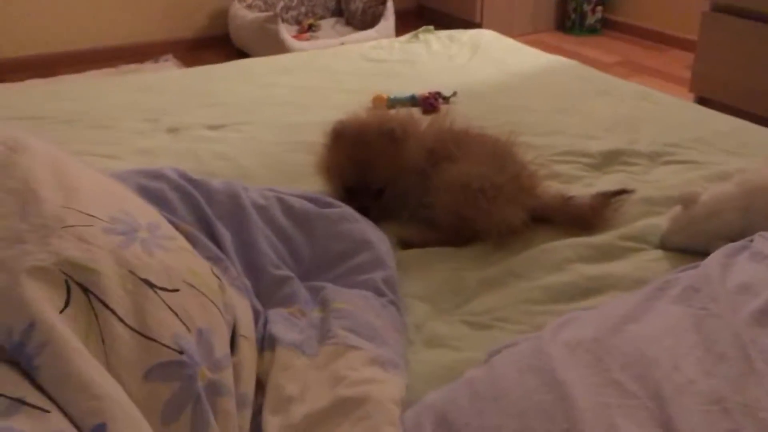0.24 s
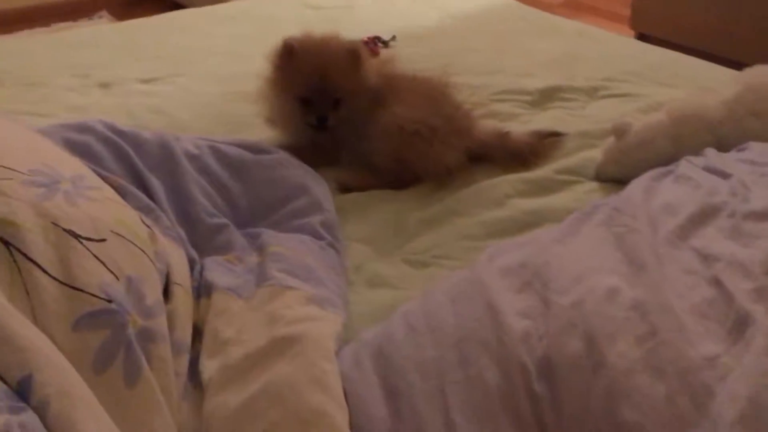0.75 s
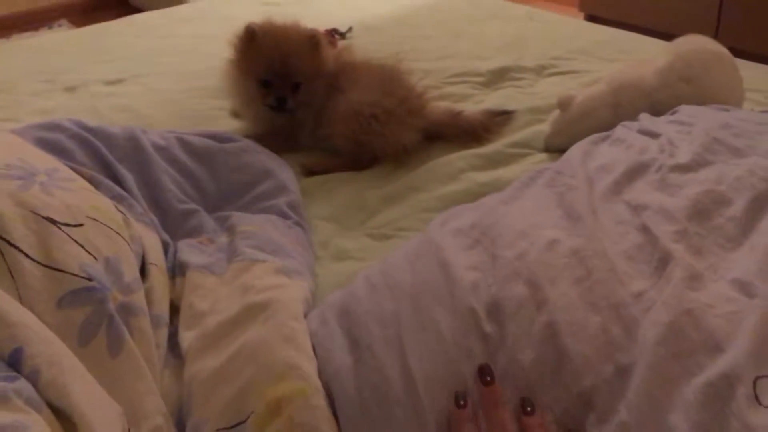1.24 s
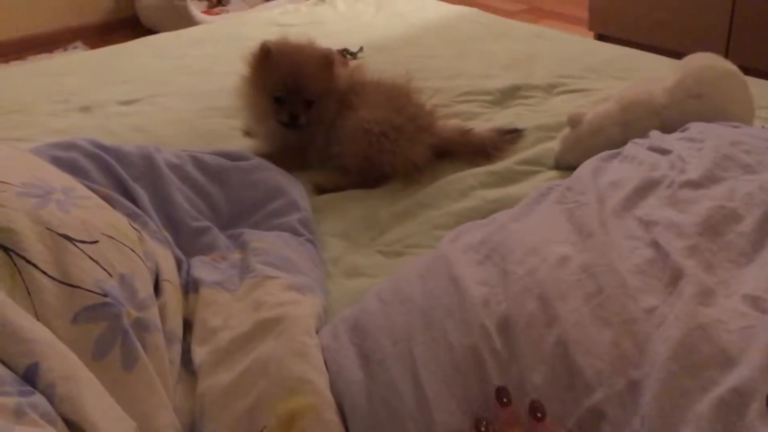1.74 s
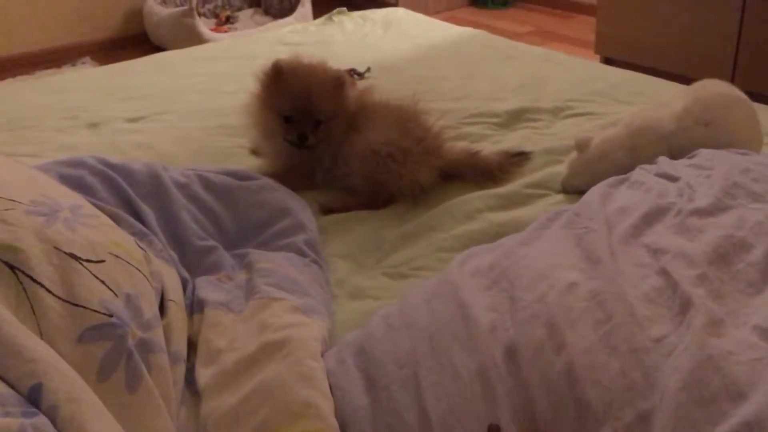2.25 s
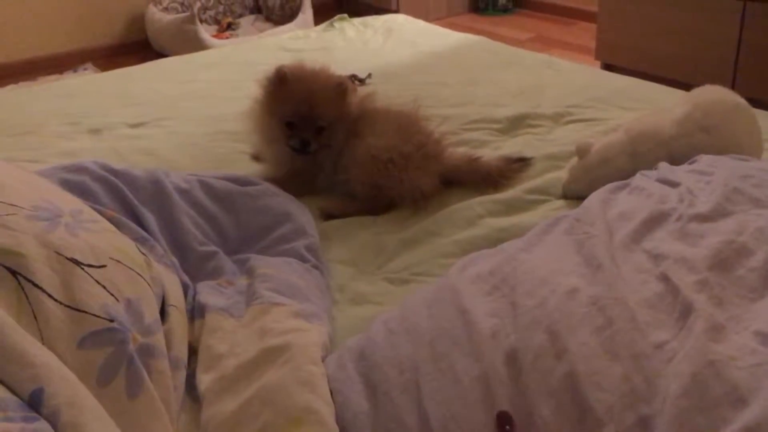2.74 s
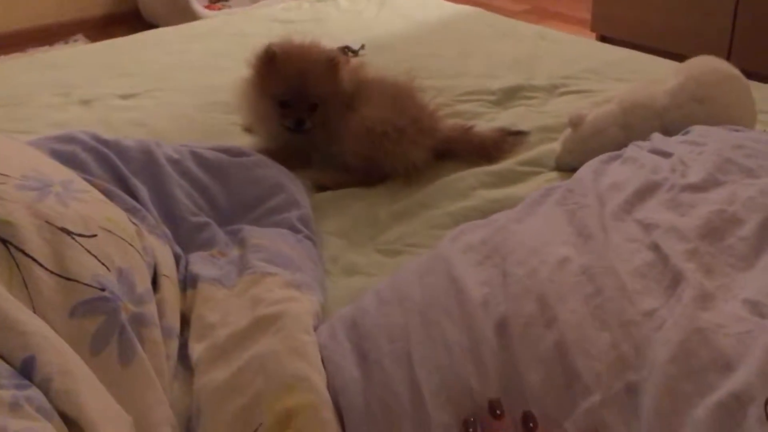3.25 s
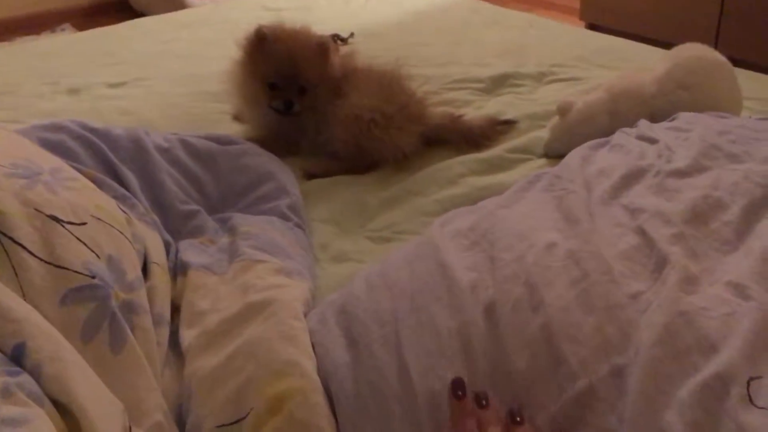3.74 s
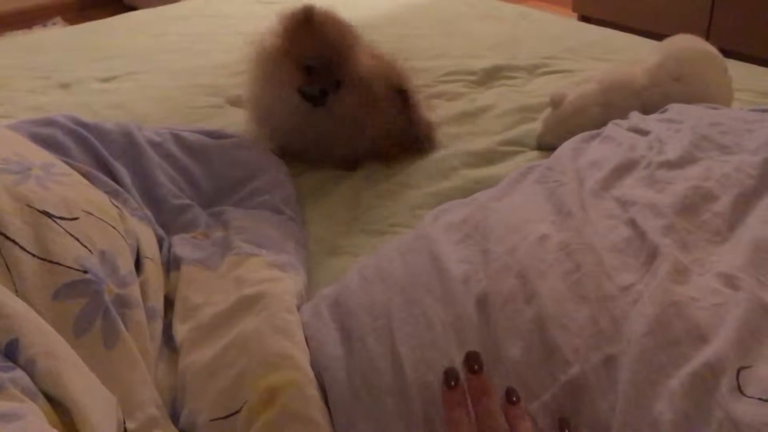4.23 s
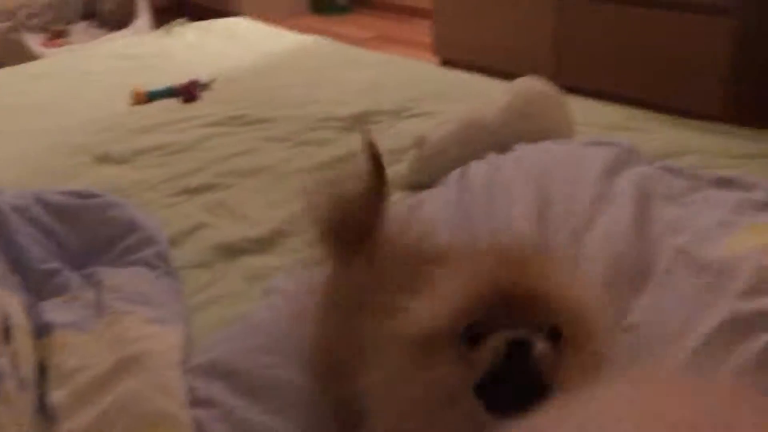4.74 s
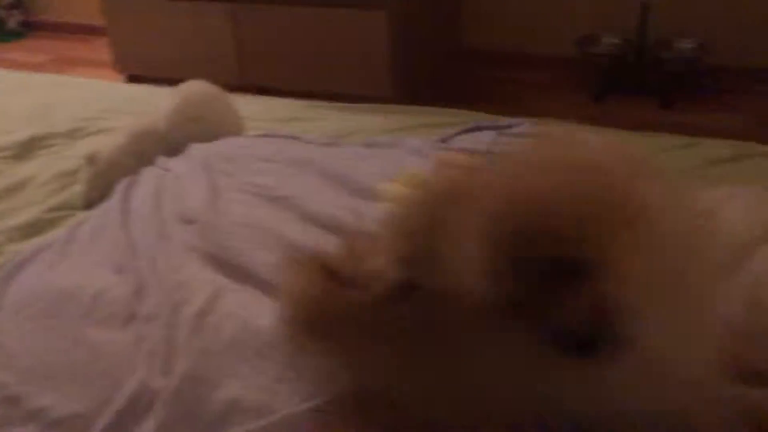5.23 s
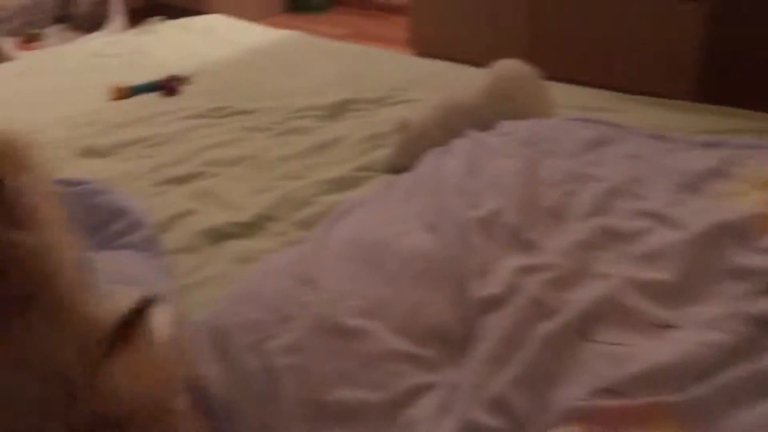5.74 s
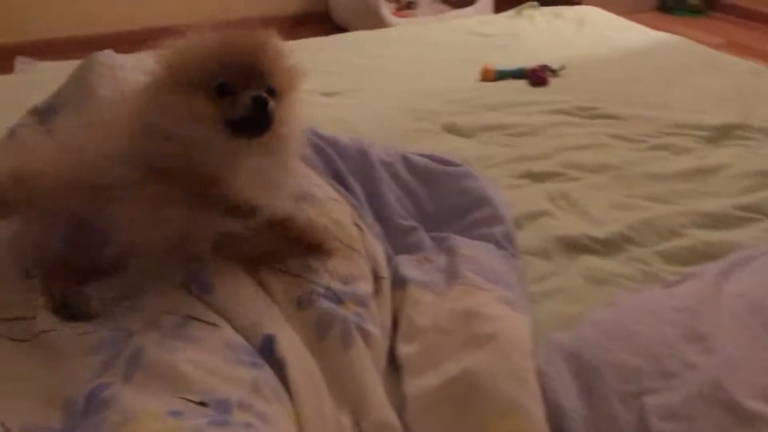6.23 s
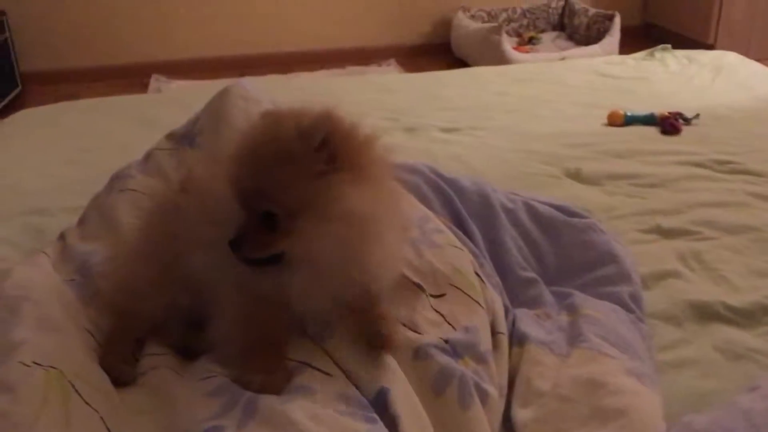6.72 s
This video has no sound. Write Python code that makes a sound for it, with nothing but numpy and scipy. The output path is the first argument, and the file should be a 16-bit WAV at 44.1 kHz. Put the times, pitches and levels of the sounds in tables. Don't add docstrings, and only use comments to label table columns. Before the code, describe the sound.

Soft pats and a flat slap on bedding, light finger drumming, then scrambling paws, one sharp tiny-dog yap, faint panting and rustling cloth.

```python
import sys
import numpy as np
from scipy import signal
from scipy.fft import rfft, irfft, next_fast_len
from scipy.io import wavfile
from scipy.ndimage import uniform_filter1d, minimum_filter1d

SR = 44100
rng = np.random.default_rng(int(sys.argv[2]) if len(sys.argv) > 2 else 0)


def transcribe(signal):
    frames = np.atleast_2d(signal).T
    limited = np.clip(frames, -1, 1)
    pcm = np.round(limited * 32767).astype(np.int16)
    wavfile.write(sys.argv[1], SR, pcm)


def voltage_ratio(decibels):
    exponent = np.asarray(decibels, float) / 20
    return 10 ** exponent


N = 307818

# (frequency [Hz], level [dB])
HUSH_SPECTRUM = [(13, -33), (22, -27.5), (49, 2), (72, 0), (124, -6.5), (177, -15.5), (298, -13),
                 (476, -25), (609, -23), (824, -28), (2340, -32.5), (4390, -37), (4900, -37.5), (9220, -39),
                 (15500, -44)]
# (frequency [Hz], width [Hz], level [dB])
HOUSE_NOTES = [(59, 4.7, -64), (85.5, 20, -72)]
# (frequency [Hz], t60 [s])
ROOM_T60 = [(200, 0.2), (800, 0.37), (1600, 0.4), (3000, 0.41), (6000, 0.46), (14000, 0.38)]
# (frequency [Hz], level [dB], t60 [s])
PANELS = [(1556, -36, 0.51), (1585, -37.5, 0.45), (1609.7, -44, 0.94), (1676, -47, 1), (2000, -41.5, .6),
          (2223, -45, .6), (2560, -35.5, 0.6), (3830, -40, .4), (4110, -41.5, 0.76)]
# (time [s], drag [dB], weight on mattress [dB])
RUSTLE_BOUTS = [
    [(0.0, -69, -64), (0.15, -68.5, -59), (0.39, -76.5, -53), (0.6, -99, -57)],
    [(4.5, -85, -57), (4.616, -70, -52), (4.738, -62.5, -44.5), (4.93, -61.5, -48.5), (5.075, -69, -58.5)],
    [(5.25, -66, -53), (5.5, -63.5, -56), (5.74, -66.5, -47.5), (5.908, -68, -59), (6.134, -73, -66.5),
     (6.5, -80.5, -82)],
]
BOUT_FIZZ_DB = [-13.5, -7, -3.5]
# (frequency [Hz], level [dB])
SWISH_SPECTRUM = [(180, -31), (300, -3.5), (403, -4), (480, -12), (1310, -12.5), (1600, -15), (2500, -17),
                  (2980, -24), (5000, -29), (6500, -63), (11000, -120)]
# (frequency [Hz], level [dB])
FIZZ_SPECTRUM = [(2500, -31), (4500, -2), (7000, 1), (12000, -4), (15500, -4)]
# (frequency [Hz], level [dB])
HEAVE_SPECTRUM = [(15, -44.5), (25, -13), (46, 6.5), (92, -6.5), (134, -5), (301, -11.5), (372, -14),
                  (494, -24.5), (900, -33), (1170, -58), (1980, -120)]
# (time [s], peak [dB], centre [Hz], width [Hz], length [s])
CATCHES = [(.3972, -45, 2600, 3000, .004), (0.4044, -27, 1900, 890, 0.0038),
           (.4052, -29.5, 3300, 1390, 0.0021), (0.4057, -35, 8000, 9000, 0.0011),
           (2.341, -63, 2300, 300, .006), (4.6984, -39.5, 2950, 1400, .003),
           (4.6988, -50, 6500, 3500, 0.0032), (4.758, -33, 2000, 1490, 0.0034),
           (4.842, -48.5, 11800, 1400, 0.024), (4.8427, -41, 6800, 6000, 0.007),
           (4.848, -39, 6500, 6000, 0.0051), (4.851, -41.5, 3000, 1200, 0.0036),
           (4.86, -40.5, 6500, 6000, 0.004), (4.9019, -35.5, 2500, 2630, 0.0033),
           (4.902, -47.5, 8800, 2500, 0.0021), (5.0831, -24.5, 2000, 607, 0.0087),
           (5.0833, -37.5, 4000, 2500, .002), (5.16, -34.5, 55, 60.4, 0.12),
           (5.251, -48.5, 10000, 6000, 0.044), (5.414, -42.5, 8000, 1840, .004),
           (5.557, -49.5, 7250, 3500, 0.072), (5.65, -53, 6000, 2510, 0.027),
           (6.173, -53, 2200, 1494, 0.085), (6.2088, -42, 2900, 1704, 0.0034)]
# (time [s], pat [dB], pat pitch [Hz], mattress thud [dB])
FINGER_PATS = [(1.4, -41.5, 283, -42.5), (1.668, -55, 232.3, -55), (1.704, -55, 198, -45.5),
               (1.761, -54.5, 206, -54), (1.887, -63, 290, -57), (1.995, -51, 267, -47),
               (2.019, -50, 190.5, -48.5), (2.272, -58, 182.1, -69.5), (2.31, -44.5, 241, -69),
               (2.46, -68, 213, -57), (2.862, -63, 264, -49), (2.893, -48.5, 172, -50),
               (2.919, -42.5, 163.1, -46), (3.185, -47, 178, -54), (3.229, -48, 175.6, -53),
               (3.533, -56, 205, -45.5), (3.738, -57.5, 172, -55), (3.776, -59.5, 245, -49),
               (3.829, -51.5, 231, -45), (3.887, -56, 172, -76), (4.067, -52, 266, -47),
               (4.114, -45.5, 265, -45), (4.177, -61, 239, -51), (4.336, -57, 188.2, -48),
               (4.397, -42.5, 257, -41.5), (4.446, -57, 207, -64)]
# (time [s], pat [dB], pat pitch [Hz],
# mattress thud [dB])
PAW_PATS = [(0.214, -43.5, 152, -44), (0.233, -52, 151.2, -60), (0.455, -60, 150, -32.5),
            (0.51, -64, 150, -38), (0.543, -63, 150, -38.5), (4.564, -46, 152, -39),
            (4.58, -61, 151, -33.5), (4.625, -44.5, 177, -42), (4.696, -55, 200, -39.5),
            (4.767, -32.5, 195, -44), (4.779, -29, 240, -34.5), (4.789, -31, 159, -35),
            (4.804, -34.5, 302, -42), (4.868, -47.5, 151, -30.5), (4.886, -37, 209.1, -31.5),
            (4.93, -48, 332.4, -37), (5.168, -32, 153.6, -49), (5.257, -35, 337, -37),
            (5.34, -44, 146.3, -52), (5.515, -38.5, 147, -32), (5.574, -39, 369, -34.5),
            (5.617, -55, 157, -41), (5.67, -49, 224, -30.5), (5.727, -43, 148.2, -39),
            (5.802, -41, 154.4, -38), (5.851, -47, 151, -39.5), (5.905, -52, 222.6, -45),
            (6.474, -56, 229, -49)]
# (time [s], pat [dB], pat pitch [Hz], mattress thud [dB], cloth tick [dB])
HAND_SLAPS = [
    (.395, -39, 507, -65.5, -42),
    (.3995, -24.5, 417, -60, -35),
    (.4028, -20, 450, -47, -27),
    (.402, -40, 297, -19, -70.5),
    (2.342, -46, 400, -46.5, -62),
    (2.627, -42, 410, -43.5, -51),
]
# (start [s], length [s], level [dB], mouth opening as resonance factor [1])
PANTS = [
    (5.283, 0.43, -51.5, 0.97),
    (5.659, 0.5348, -69, 0.985),
    (6.122, 0.33, -68.5, 0.886),
]
# (frequency [Hz], width [Hz], level [dB])
SNOUT = [(2027, 200, -1.5), (2495, 196, -2), (3290, 330, -3), (3865, 450, -1.5)]
# (frequency [Hz], level [dB])
THROAT_SLOPE = [(250, -44.5), (400, -32.5), (800, -27.5), (1200, -14), (2000, -12.5), (3000, -18),
                (4500, -20.5), (5200, -32.5), (7300, -38), (8200, -51.5), (11400, -61.5), (13500, -49),
                (15500, -49)]
# (frequency [Hz], width [Hz], lift [dB])
FORMANTS = [(1530, 180, 9.5), (2680, 250, 10.5), (3500, 240, 4.5), (4500, 52, 7), (5600, 450, 5.5)]
# (frequency [Hz], width [Hz], lift [dB])
NOSE_DIPS = [(2390, 170, -18), (3130, 130, -9), (4800, 250, -13)]
# (time [s], pitch [Hz], effort [dB])
YAP = [
    (5.085, 399, -33.5),
    (5.096, 504, -21.5),
    (5.11, 626, -10.5),
    (5.12, 719, -7.5),
    (5.134, 772.6, -4),
    (5.148, 809.3, -6),
    (5.156, 842, -11.5),
    (5.158, 621.5, -13),
    (5.174, 683.4, -12.5),
]


def evened(x):
    return x / np.sqrt(np.mean(x ** 2) + 1e-20)


def read(points, hz):
    f, value = np.transpose(points)
    return np.interp(np.log(hz + 1), np.log(f + 1), value)


def add(mix, start_s, sound):
    part = mix[round(start_s * SR):][:len(sound)]
    part += sound[:len(part)]


def spread(rows):
    s, *columns = np.transpose(rows)
    t = np.arange(s[0], s[-1], 1 / SR)
    return s[0], [np.interp(t, s, column) for column in columns]


def resonate(x, hz, width_hz):
    turn = np.exp(2j * np.pi * np.cumsum(hz * np.ones(len(x))) / SR)
    r = np.exp(-np.pi * width_hz / SR)
    return 2 * (turn * signal.lfilter([1 - r], [1, -r], x / turn + 1e-18)).real


def resonate_twice(x, hz, width_hz):
    return resonate(resonate(x, hz, width_hz), hz, width_hz)


def coloured(x, points):
    size = next_fast_len(len(x) + 2048)
    gain = voltage_ratio(read(points, np.fft.rfftfreq(size, 1 / SR)))
    return irfft(rfft(x, size) * gain, size)[:len(x)]


def lumps(count, size):
    return evened(uniform_filter1d(uniform_filter1d(rng.standard_normal(count), size), size))


def lumpy_noise(count, depth_db, size):
    return rng.standard_normal(count) * voltage_ratio(depth_db * lumps(count, size))


def burst(seconds, hz, width_hz, push=0):
    t = np.arange(6000) / SR / seconds
    puff = (push + rng.standard_normal(len(t))) * t * np.exp(-t)
    puff = resonate_twice(puff, hz, width_hz)
    return puff / abs(puff).max()


def bumps(modes, hz):
    return sum(db / (1 + (2 * (hz - f) / w) ** 2) for f, w, db in modes)


def hush():
    wander = voltage_ratio(1.6 * lumps(N, size=2500))
    noise = coloured(rng.standard_normal(N), HUSH_SPECTRUM)
    low = signal.sosfiltfilt(signal.butter(2, 400, fs=SR, output="sos"), noise)
    notes = sum(voltage_ratio(db) * evened(resonate_twice(rng.standard_normal(N), hz, w))
                for hz, w, db in HOUSE_NOTES)
    return voltage_ratio(-61) * evened(noise - low + low * wander) + notes


def room(x):
    taps = np.zeros(SR)
    at = np.arange(300, SR - 20, 20)
    taps[at + rng.integers(0, 20, len(at))] = rng.choice([-1., 1.], len(at))
    hz, t, z = signal.stft(taps, SR, nperseg=256)
    decay = voltage_ratio(-60 * t / read(ROOM_T60, hz)[:, None])
    tail = signal.istft(z * decay, SR, nperseg=256)[1]
    return signal.fftconvolve(x, tail / np.linalg.norm(tail))[:N]


def rings(x):
    t = np.arange(SR) / SR
    panels = sum(voltage_ratio(db - 60 * t / t60) * np.sin(2 * np.pi * hz * t) for hz, db, t60 in PANELS)
    return signal.fftconvolve(x, panels * voltage_ratio(-30.5))[:N]


def rustle(rows, fizz_db):
    s, (drag_db, heave_db) = spread(rows)
    count = len(drag_db)
    swish = evened(coloured(lumpy_noise(count, 1.5, size=300), SWISH_SPECTRUM))
    fizz = evened(coloured(lumpy_noise(count, 2.5, size=40), FIZZ_SPECTRUM))
    heave = evened(coloured(lumpy_noise(count, 2.4, size=900), HEAVE_SPECTRUM))
    sound = voltage_ratio(drag_db + 7.5) * swish
    sound += voltage_ratio(drag_db + fizz_db + 1.5) * fizz
    sound += voltage_ratio(heave_db - 2.0) * heave
    return s, sound * signal.windows.tukey(count, .05)


def snag(peak_db, hz, width_hz, length_s):
    return voltage_ratio(peak_db) * burst(0.19 * length_s, hz, width_hz)


def pat(pat_db, hz, thud_db, tick_db, t60_s):
    t = np.arange(6000) / SR
    thud = -np.sin(2 * np.pi * 93 * rng.uniform(.93, 0.98) * t)
    thud *= voltage_ratio(-60 * t / t60_s) * (1 - np.exp(-(t / 0.0044) ** 2))
    push = np.sin(2 * np.pi * hz * t) * t * np.exp(-t * hz / 0.29)
    push = push / abs(push).max() + 0.7 * burst(0.00055, 2.2 * hz, 680, push=1.2)
    tick = burst(0.0001, 1300, 1500, push=2.1)
    return voltage_ratio(pat_db) * push + voltage_ratio(thud_db + 5.5) * thud + voltage_ratio(tick_db + 4.5) * tick


def pant(s, length_s, level_db, mouth):
    rise_share, fall_share, edge_db = 0.23, .35, -14.5
    share = np.arange(0, length_s, 1 / SR) / length_s
    edge = np.maximum(1 - share / rise_share, 1 - (1 - share) / fall_share)
    swell_db = edge_db * np.clip(edge, 0, 1)
    air = rng.standard_normal(len(share))
    snout = sum(voltage_ratio(db) * resonate_twice(air, hz * mouth, w) for hz, w, db in SNOUT)
    return s, voltage_ratio(level_db + swell_db) * evened(snout) * signal.windows.tukey(len(air), .1)


def throat_db(hz, mouth):
    return read(THROAT_SLOPE, hz / mouth) + bumps(FORMANTS, hz / mouth) + bumps(NOSE_DIPS, hz)


def voice(hz, mouth, rough, lowest, edge_db=0, smear=.08):
    edge_hz = 6300
    turns = np.cumsum(hz * (1 + .1 * rough * lumps(len(hz), size=60))) / SR
    order = np.arange(lowest, 60)[:, None]
    harmonic_hz = order * hz
    press_db = edge_db / (1 + (edge_hz / harmonic_hz) ** 8)
    height = voltage_ratio(throat_db(harmonic_hz, mouth) + press_db) * (harmonic_hz < 15600)
    folds = (-height * np.cos(2 * np.pi * order * turns + smear * order ** 2)).sum(0)
    folds /= np.sqrt((height ** 2).sum(0) / 2)
    shape = [(f, throat_db(f, mouth.mean())) for f in np.geomspace(200, 16000, 200)]
    beats = 0.49 + np.exp(-(turns % 1) / 0.24)
    puffs = evened(coloured(beats * rng.standard_normal(len(hz)), shape))
    return folds + rough * puffs, turns


CRACK_S, CRACK_RISE_S = 5.1545, .0035


def crack():
    hold_s, fall_s, level_db, end_db = .013, .021, -13, -12
    fast_hz, slow_hz, mouth = 244.5, 168.3, .88
    knees = np.cumsum([0, CRACK_RISE_S, hold_s, fall_s])
    t = np.arange(0, knees[-1], 1 / SR)
    effort_db = level_db + np.interp(t, knees, [-22, 1.5, -1.5, end_db])
    hz = np.interp(t, [knees[2] - .006, knees[2]], [fast_hz, slow_hz])
    rattle = voice(hz, mouth * np.ones(len(t)), .25, lowest=2, smear=.4)[0]
    rattle = signal.sosfilt(signal.butter(4, 1150, "high", fs=SR, output="sos"), rattle)
    return CRACK_S, voltage_ratio(effort_db) * rattle * signal.windows.tukey(len(hz), .1)


def yap():
    sink_s, sink_to_hz, sink_hz_per_s, sink_db_per_s = .08, 358, -6600, -640
    mouth_start, mouth_open, open_s = 0.68, 1, 0.016
    mouth_broken, shut_power = .88, 0.52
    nose_rise_db, nose_sink_db = -38.5, -53.5
    gulp_s, gulp_db, gulp_wide_s = 5.233, -43, .014
    edge_start_db, edge_end_db, edge_s = 6, -8, .04
    s, (hz, effort_db) = spread(YAP)
    down_s = np.arange(0, sink_s, 1 / SR)
    hz = np.r_[hz, np.maximum(hz[-1] + sink_hz_per_s * down_s, sink_to_hz)]
    effort_db = np.r_[effort_db, effort_db[-1] + sink_db_per_s * down_s]
    t = s + np.arange(len(hz)) / SR
    opening = mouth_open - (mouth_open - mouth_start) * np.exp(-(t - s) / open_s)
    shutting = mouth_broken * (hz / YAP[-1][1]) ** shut_power
    mouth = np.where(t < CRACK_S + CRACK_RISE_S, opening, shutting)
    nose = voltage_ratio(np.where(t < CRACK_S, nose_rise_db, nose_sink_db))
    nose = nose + voltage_ratio(gulp_db) * np.exp(-((t - gulp_s) / gulp_wide_s) ** 2)
    hz, effort_db, mouth, nose = uniform_filter1d([hz, effort_db, mouth, nose], size=90, mode="nearest")
    edge_db = edge_end_db + (edge_start_db - edge_end_db) * np.exp(-((t - s) / edge_s) ** 2)
    squeak, turns = voice(hz, mouth, .03, lowest=2, edge_db=edge_db)
    sound = voltage_ratio(effort_db) * squeak + nose * np.sqrt(2) * np.sin(2 * np.pi * turns)
    return s, sound * signal.windows.tukey(len(hz), .015)


def scene():
    finger_tick_db, paw_tick_db = -83, -68
    dog, bed = np.zeros(N), np.zeros(N)
    for rows, fizz_db in zip(RUSTLE_BOUTS, BOUT_FIZZ_DB):
        add(bed, *rustle(rows, fizz_db))
    for s, *scratch in CATCHES:
        add(bed, s, snag(*scratch))
    for blows, rest in (HAND_SLAPS, [.12]), (FINGER_PATS, [finger_tick_db, .1]), (PAW_PATS, [paw_tick_db, .08]):
        for s, *blow in blows:
            add(bed, s + 0.0017, pat(*blow, *rest))
    for row in PANTS:
        add(bed, *pant(*row))
    add(dog, *crack())
    add(dog, *yap())
    reverb = room(voltage_ratio(-11.5) * dog + voltage_ratio(-12) * bed)
    return (dog + bed + reverb + rings(dog) + hush())[None]


def band_limit(x):
    return signal.sosfilt(signal.butter(12, 15680, fs=SR, output="sos"), x)


def record(dry):
    peak = -minimum_filter1d(-abs(dry), size=200)
    held = dry / np.maximum(uniform_filter1d(peak, size=200) / 1.02, 1)
    return band_limit(np.clip(held, -1, 1))


dry = scene()
out = record(dry)
transcribe(out)
```